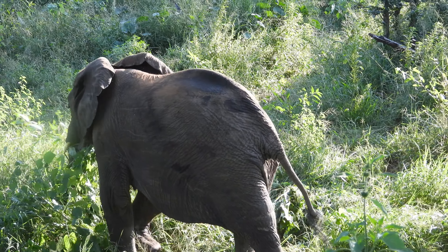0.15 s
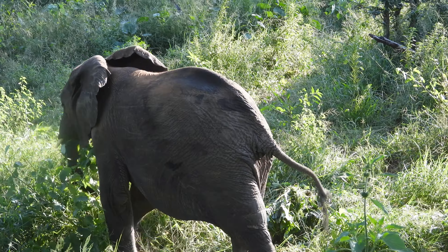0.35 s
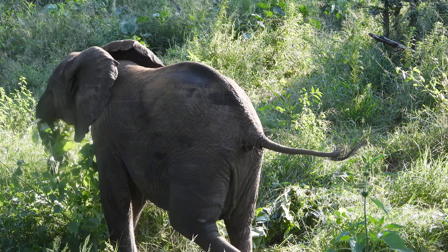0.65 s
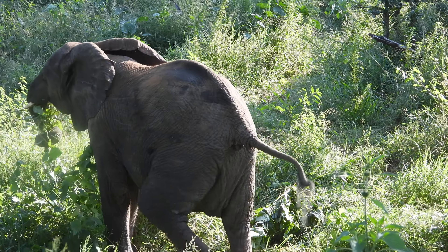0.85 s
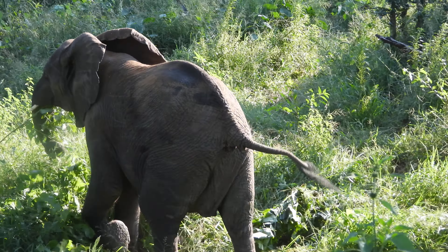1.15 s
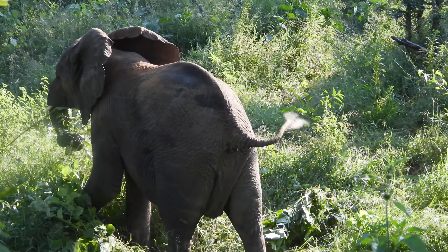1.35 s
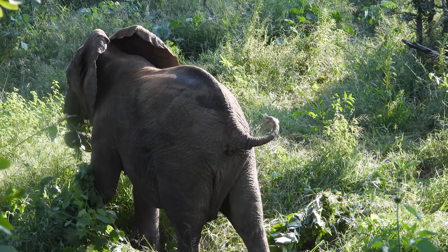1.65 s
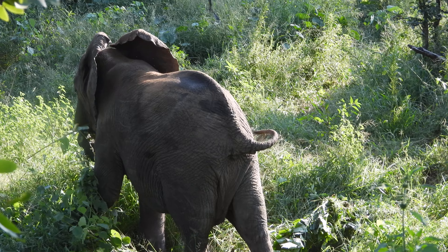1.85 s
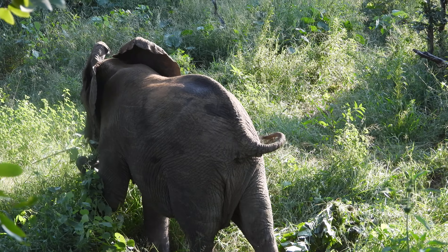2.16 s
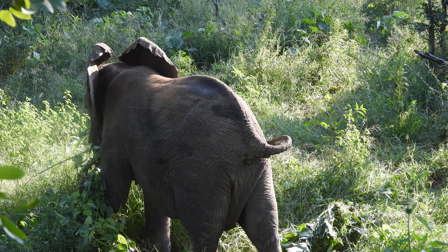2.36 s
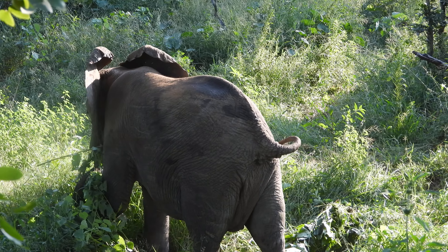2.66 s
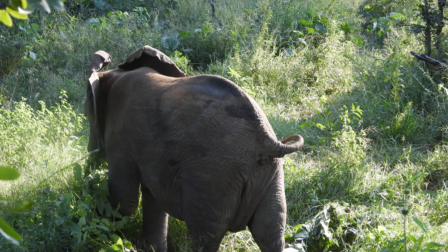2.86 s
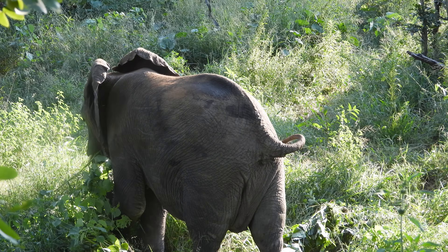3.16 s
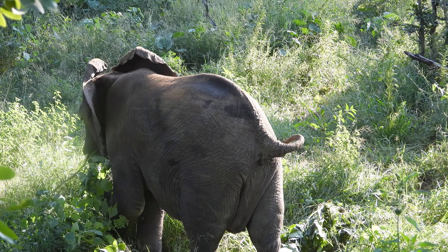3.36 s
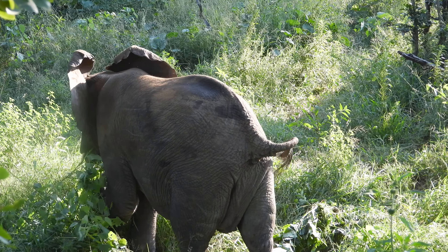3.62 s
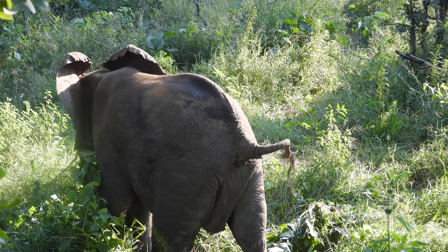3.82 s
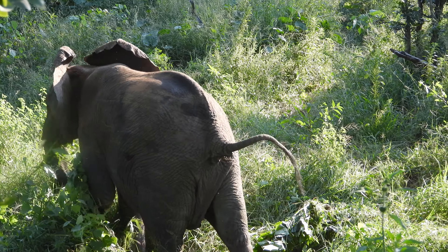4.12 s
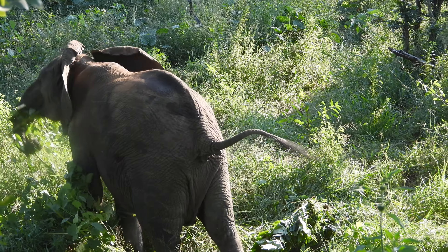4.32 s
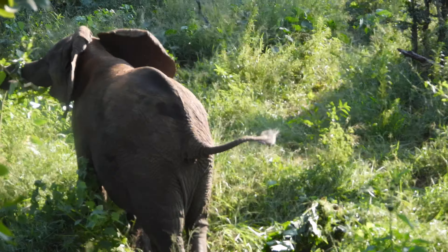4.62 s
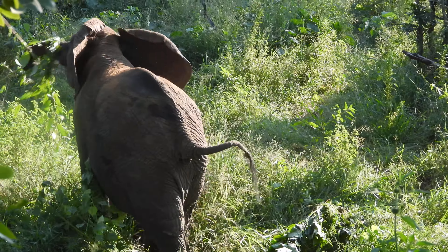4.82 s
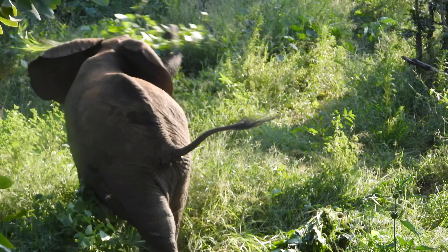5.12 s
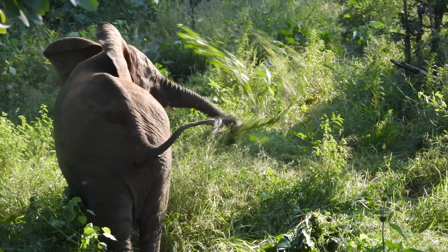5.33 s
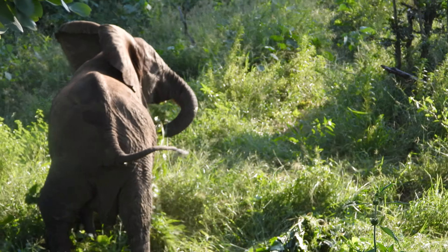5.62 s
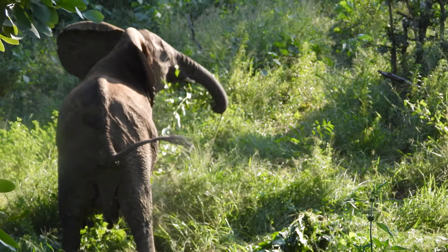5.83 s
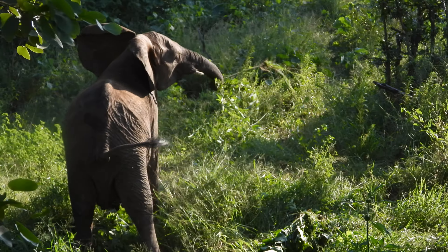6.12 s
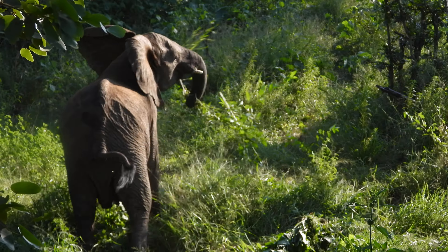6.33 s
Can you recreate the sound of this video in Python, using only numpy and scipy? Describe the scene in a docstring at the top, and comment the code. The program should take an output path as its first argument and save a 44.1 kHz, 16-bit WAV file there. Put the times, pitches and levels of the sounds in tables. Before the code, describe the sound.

Quiet leaves stir and far doves coo, then woody snaps and heavy leafy tearing burst out twice as an elephant pulls at plants.

```python
"""An elephant walks through scrub and tears up a leafy stem, some metres from a small camera. From the start
leaves stir as grainy noise over a steady hiss, and far doves coo in chorus as sagging tones. Soon come pulls
that swell and fade, twigs that snap with a click, ring and thud, and gliding whistles. A small bird first
chirps just before 1.4 s; thick tearing follows near 3.8 s and again from 5.4 s. Throughout, two ports hear it
through the camera housing's colour; source levels are set before that."""
import sys
import numpy as np
from scipy import signal
from scipy.fft import rfft, irfft
from scipy.io import wavfile
from scipy.ndimage import uniform_filter1d

SR = 44100
rng = np.random.default_rng(int(sys.argv[2]) if len(sys.argv) > 2 else 0)


def pcm_store(signal):
    """Save signal as 16-bit PCM."""
    levels = np.round(np.clip(np.atleast_2d(signal), -1, 1) * 32767)
    wavfile.write(sys.argv[1], SR, levels.astype(np.int16).T)


N = 285758  # samples


def amp(db):
    """Turns decibels into an amplitude factor."""
    return 10 ** (np.asarray(db) / 20)


def evened(x):
    """Brings a sound to rms 1."""
    return x / np.sqrt(np.mean(x ** 2) + 1e-20)


def read(points, hz):
    """Reads a spectral curve between its points, on a log pitch axis."""
    f, value = np.transpose(points)
    return np.interp(np.log(hz + 1), np.log(f + 1), value)


def curves(rows):
    """Draws each column of a timed table as straight lines over the whole scene."""
    s, *columns = np.transpose(rows)
    t = np.arange(N) / SR
    return [np.interp(t, s, column) for column in columns]


def add(mix, s, sound):
    """Lays a sound into the mix at s seconds, cut off at the end of the scene."""
    part = mix[..., round(s * SR):][..., :sound.shape[-1]]
    part += sound[..., :part.shape[-1]]


def coloured(x, points):
    """Shapes x by a spectrum and brings it to rms 1."""
    gain = amp(read(points, np.fft.rfftfreq(N, 1 / SR)))
    return evened(irfft(rfft(x) * gain, N))


def glide(hz, level):
    """A sine that follows a moving pitch and level."""
    phase = 2 * np.pi * np.cumsum(hz) / SR
    return level * np.sin(phase)


def flutter(size, per_s):
    """Random wobble: normal random values, per_s of them a second, joined by straight lines."""
    steps = rng.standard_normal(round(size * per_s / SR) + 2)
    return np.interp(np.arange(size) * per_s / SR, np.arange(len(steps)), steps)


def scrub_echo(x, t60, wet_db):
    """Trunks and bushes scatter a far call: sparse fading taps on three separate paths."""
    t = np.arange(SR // 2) / SR
    hits = rng.random((3, len(t))) < .04
    taps = rng.standard_normal((3, len(t))) * hits * amp(-60 * t / t60)
    taps /= np.linalg.norm(taps, axis=1, keepdims=True)
    return x + amp(wet_db) * signal.fftconvolve(x[None], taps, axes=1)[:, :N]


# Spectrum of the steady hiss beneath everything: f/Hz, level/dB per Hz
HISS_SPECTRUM = [(15, -90), (25, -60), (86, -29), (193, -6), (685, -12), (805, -10), (1140, -27),
                 (5160, -13), (8610, -14.5), (11300, -22), (15600, -76)]
HISS_DB = -65.5


def steady_hiss():
    """Steady coloured noise, separate on each side."""
    return amp(HISS_DB) * coloured(rng.standard_normal((2, N)), HISS_SPECTRUM)


# Leaves stirring all the while: t/s, level/dB
STIR_LEVELS = [(0, -52.5), (.2, -55.5), (.4, -52), (1.1, -54), (1.62, -51.5), (1.75, -57), (2.3, -55.5),
               (2.5, -52.5), (3.22, -53.5), (3.35, -56.5), (3.75, -55), (4.25, -53), (5.2, -50.5),
               (5.42, -53), (6.48, -78)]
# Pulls, tears and sweeps through the growth: start t/s, rise/s, hold/s, fade/dB per s,
# leaves level/dB, stalks level/dB, share of breaking/0-1, deep part relative to the stalks/dB
GROWTH_PULLS = [(0.22, 0.065, 0.018, 91, -52, -61.5, 0, -3),
                (0.71, 0.025, 0.22, 108, -45.5, -59, 0.27, -14),
                (1.135, 0.023, 0.018, 59, -55.5, -83, 0, 0), (1.344, 0.051, 0.022, 49, -53.5, -81, 0.3, 0),
                (3.781, 0.059, 0.035, 72, -40, -55, 0.5, 0), (3.903, 0.048, 0.046, 114, -41.5, -57, 0.1, 5),
                (4.343, 0.019, 0.23, 40, -47, -66.5, 0, 6.5), (4.9, 0.042, 0.034, 68, -51, -66, 0.4, 2),
                (5.375, 0.091, 0.048, 166, -50.5, -52, 0.3, -4),
                (5.507, 0.095, 0.03, 40, -42, -52.5, 0.3, -10),
                (5.614, 0.089, 0.056, 21, -37.5, -55.5, 0.1, -1),
                (6.217, 0.11, 0.015, 86, -54.5, -63, 0.1, -7)]
STALKS_REST_DB = -71
DEEP_FADE = 2.2  # the deep part dies this many times faster
STIR_BREAKING = 0.076  # share 0-1


def pulls():
    """Each pull swells, holds and fades; powers add to the resting levels."""
    t = np.arange(N) / SR
    leaf = amp(2 * curves(STIR_LEVELS)[0])  # twice the dB gives power
    stalk = amp(2 * STALKS_REST_DB) * np.ones(N)
    broken, deep = STIR_BREAKING * leaf, stalk
    for s, rise, hold, fade_db, leaf_db, stalk_db, breaking, deep_db in GROWTH_PULLS:
        swell = np.clip((t - s) / max(rise, .005), 0, 1) ** 2
        fade = amp(-2 * fade_db * np.maximum(t - s - rise - hold, 0))
        shape = swell * fade
        leaf = leaf + amp(2 * leaf_db) * shape
        stalk = stalk + amp(2 * stalk_db) * shape
        deep = deep + amp(2 * (stalk_db + deep_db)) * shape ** DEEP_FADE
        broken = broken + breaking * amp(2 * leaf_db) * shape
    share = np.clip(broken / leaf, 0, 1)
    return 10 * np.log10(leaf), 10 * np.log10(stalk), 10 * np.log10(deep), share


def crackle(per_s, spread_db, t60):
    """Power envelope of many small breaks and flicks; a few are large."""
    breaks = rng.random(N) < per_s / SR
    size = amp(spread_db * np.minimum(rng.exponential(size=N), 5)) * breaks
    power = signal.lfilter([1], [1, -amp(-120 / t60 / SR)], size ** 2)
    power = uniform_filter1d(power, size=80)  # each break takes a moment to build
    return power / power.mean()


def patchy(x, patch_db, size=256):
    """Random patches in time and pitch make the noise uneven."""
    z = signal.stft(x, nperseg=size)[2]
    field = rng.standard_normal(z.shape[1:])
    field = uniform_filter1d(field, size=3, axis=0)  # across pitch
    field = evened(uniform_filter1d(field, size=6, axis=1))  # across time
    return evened(signal.istft(z * amp(patch_db * field), nperseg=size)[1][:, :N])


# Spectrum of dry leaves, and of splintering twigs: f/Hz, level/dB per Hz
LEAF_SPECTRUM = [(290, -25.5), (500, -15), (716, -5.5), (1000, -8), (1560, -6.5), (1880, -7.5),
                 (3860, -2.5), (5370, -4), (10900, -11), (15600, -29.5)]
# Spectrum of knocking stalks, and of fibres in a thud: f/Hz, level/dB per Hz
STALK_SPECTRUM = [(20, -60), (100, -47), (150, -3), (215, -3), (400, -2.5), (600, 3), (720, -2.5),
                  (950, -6), (1500, -10.5), (2000, -17.5), (6000, -67)]
# the band above about 9.5 kHz thins when the rustle falls below the knee
TREBLE_DB, TREBLE_KNEE_DB, TREBLE_SLOPE = -4, -53.5, 2.3  # dB, dB, dB per dB


def rustle():
    """Noise gated by grains; stalks give the low body, dry leaves the treble."""
    leaf_db, stalk_db, deep_db, share = pulls()
    treble_db = TREBLE_DB + TREBLE_SLOPE * np.minimum(leaf_db - TREBLE_KNEE_DB, 0)

    grains = np.sqrt(1 - share + share * crackle(per_s=900, spread_db=3., t60=.012))
    leaves = patchy(coloured(grains * rng.standard_normal((3, N)), LEAF_SPECTRUM), 1.67)
    leaves = patchy(leaves, 2.2, size=2048)  # slower, narrower patches: a more tonal rustle
    treble = signal.sosfiltfilt(signal.butter(2, 9500, "high", fs=SR, output="sos"), leaves)
    leaves = leaves + (amp(treble_db) - 1) * treble

    knocks = np.sqrt(0.49 + 0.49 * crackle(per_s=70, spread_db=1.6, t60=0.02))
    stalks = coloured(knocks * rng.standard_normal((3, N)), STALK_SPECTRUM)
    stalks = patchy(stalks, 4.5, size=1024)
    deep = signal.sosfiltfilt(signal.butter(2, 330, fs=SR, output="sos"), stalks)
    return amp(leaf_db) * leaves + amp(stalk_db) * (stalks - deep) + amp(deep_db) * deep


# Dove chorus: t/s, level/dB, share of high voices/0-1
DOVE_CHORUS = [(0, -52.5, 0.12), (.55, -62.5, 0.41), (.96, -55, 0.35), (1.17, -59, 0.24),
               (1.75, -59.5, 0.28), (2.1, -57.5, 0.4), (2.52, -55.5, 0.77), (2.68, -58.5, 0.58),
               (2.97, -55, 0.54), (3.36, -62, 0.3), (3.56, -52, 0.93), (3.75, -60.5, 0.52),
               (4.15, -53, 0.6), (5.1, -56.5, 0.37), (5.4, -54.5, 0.88), (5.7, -70, 0.66),
               (5.92, -50.5, .8), (6.16, -68, 0.4), (6.48, -57, 1)]
LOW_COO_HZ, HIGH_COO_HZ = 806, 884
COO_SPREAD_HZ, COO_SAG_HZ = 62, 25  # largest offset either way, largest sag


def doves():
    """Many far birds coo at once: short purring notes that sag, smeared by the scrub."""
    level_db, high = curves(DOVE_CHORUS)
    out, count = np.zeros(N), 600
    for k, (late, long, off, lean, sag, loud, voice) in enumerate(rng.random((count, 7))):
        size = round((.035 + .075 * long) * SR)
        s = (k + late) / count * N / SR
        centre_hz = HIGH_COO_HZ if voice < high[int(s * SR)] else LOW_COO_HZ
        start_hz = centre_hz + COO_SPREAD_HZ * (off + lean - 1)
        hz = start_hz - COO_SAG_HZ * sag * np.linspace(0, 1, size)
        purr = 1 + .7 * flutter(size, 80)
        add(out, s, glide(hz, np.hanning(size) * purr * amp(-10 * loud)))
    return amp(level_db) * evened(scrub_echo(out, t60=0.23, wet_db=-0.82))


def causal(gain):
    """The most front-loaded click with this spectrum (minimum phase), peak 1."""
    folded = irfft(np.log(gain + 1e-5))
    folded[1:len(gain) - 1] *= 2
    folded[len(gain):] = 0
    click = irfft(np.exp(rfft(folded)))
    return click / abs(click).max()


# Snapping twigs: t/s, crack level/dB, ring f/Hz, crack t60/s, thud level/dB, factor on the stem's pitch
TWIG_SNAPS = [(0.281, -43, 5470, 0.056, -81, 1.4), (0.3286, -48, 3430, 0.022, -62.5, 1.05),
              (0.5342, -35, 5170, .012, -80, 1.3), (0.7455, -26.5, 6100, 0.05, -49.5, 1.14),
              (0.7557, -19, 3450, 0.046, -44, 1.01), (1.1884, -40, 5920, 0.066, -86, 1.4),
              (3.235, -38, 3500, .012, -80, 1), (3.8043, -41, 5500, 0.018, -60, 0.78),
              (3.8552, -25, 2260, 0.012, -58, 0.68), (3.872, -26, 5440, 0.014, -58, 0.72),
              (3.8968, -26, 5900, 0.011, -57, 1.14), (3.9303, -16.5, 2140, 0.011, -50, 0.89),
              (3.942, -25.5, 2580, 0.025, -56, 0.97), (3.9836, -21, 2170, 0.019, -63, 1.5),
              (4.003, -33, 2340, 0.073, -67, 0.57), (4.022, -35, 2450, 0.084, -70.5, 1.7),
              (4.0645, -30, 2490, 0.014, -76, 0.98), (4.4622, -36, 5630, 0.13, -74, 2.3),
              (5.3391, -36, 1930, 0.033, -56.5, 1.19), (5.4195, -26, 2340, 0.013, -48.5, 1.15),
              (5.4394, -36.5, 1700, 0.038, -47, 0.92), (5.455, -38, 1190, 0.026, -40, 1.01),
              (5.4663, -32.5, 4480, 0.023, -55, 2.06), (5.485, -48, 900, 0.021, -56, 0.76),
              (5.595, -34, 1200, 0.037, -64, 0.697), (5.615, -37, 606, 0.043, -65, 0.62),
              (5.68, -35, 1900, .03, -59, 0.86), (5.739, -37, 3240, .02, -60, 0.77),
              (5.773, -42, 990, 0.018, -72, 1.5), (5.831, -31, 2530, 0.022, -68, 1.8),
              (5.883, -33.5, 2470, .03, -72, 1), (5.913, -38, 2950, .02, -60.5, 0.71),
              (6.2955, -36, 3400, 0.019, -69.5, 1), (5.7533, -29, 1950, 0.038, -66, 0.54),
              (6.162, -36, 1270, 0.067, -70, 1.1), (6.1655, -27, 1940, 0.02, -63.5, 0.9),
              (6.1759, -29.5, 1266, 0.055, -58, 1.15), (6.3179, -32.5, 4340, 0.017, -60.5, 1.2)]
# Modes of a green stem, before the pitch factor: f/Hz, level/dB, t60/s
STEM_MODES = [(224, 0, 0.078), (354, 5, 0.11), (612, 4.5, 0.052), (873, 10, 0.043), (1225, 8.5, 0.06)]


def snaps():
    """A burst of splinters, a short ring of the twig, and a slower thud through the stem."""
    out, t = np.zeros((3, N)), np.arange(4096) / SR
    hz = np.fft.rfftfreq(len(t), 1 / SR)
    leaf_gain, stalk_gain = amp(read(LEAF_SPECTRUM, hz)), amp(read(STALK_SPECTRUM, hz))
    for s, crack_db, ring_hz, t60, thud_db, pitch in TWIG_SNAPS:
        fade = amp(-60 * t / max(t60, .004)) * (1 - np.exp(-t / 0.00033))
        body = 0.69 + 0.98 / (1 + ((hz - ring_hz) / (0.75 * ring_hz)) ** 2)
        # thin twigs hold no low sound
        body = body / (1 + (.58 * min(ring_hz, 2600) / (hz + 1)) ** 6)
        splinters = irfft(rfft(rng.standard_normal((3, len(t)))) * leaf_gain * body)
        ring = np.sin(2 * np.pi * ring_hz * t)
        crack = fade * (0.53 * evened(splinters) + 0.34 * ring)
        front = causal(leaf_gain * body)  # the first fibre parts with one sharp click

        fibres = irfft(rfft(rng.standard_normal((3, len(t)))) * stalk_gain)
        modes = np.zeros(len(t))
        for f, db, mode_t60 in STEM_MODES:
            tone = np.sin(2 * np.pi * (pitch * f * t + rng.random()))
            modes += amp(db - 60 * t / mode_t60) * tone
        thud = 0.8 * evened(fibres) * amp(-60 * t / .09) + .8 * modes
        thud = thud * (1 - np.exp(-t / .0015))  # soft onset
        add(out, s, amp(crack_db) * (crack + 0.65 * front) + amp(thud_db) * thud)
    return out


# Single far whistles and coos, before flicker: t/s, length/s, start f/Hz, end f/Hz, level/dB
FAR_WHISTLES = [(.56, .1, 1280, 1270, -68), (.88, .13, 1020, 1110, -64), (.96, .34, 1335, 1350, -71),
                (1.94, .13, 1020, 985, -66.5), (2.235, .09, 1000, 980, -62), (2.52, .09, 970, 1050, -65),
                (2.7, .22, 700, 680, -69), (2.83, .08, 1120, 1140, -63), (2.91, .05, 1350, 1365, -65),
                (3.05, .25, 1355, 1345, -71), (3.53, .06, 1000, 1000, -66), (5.525, .04, 790, 765, -54),
                (5.96, .3, 1330, 1420, -66), (6.312, .075, 990, 860, -55)]
# Notes of one chirp, a flick, down, up and a low end:
# t/s from its start, length/s, start f/Hz, end f/Hz, level relative to the chirp/dB
CHIRP_NOTES = [(0, .014, 3700, 4250, -1.5), (.013, .012, 3800, 3400, -6), (.02, .02, 3400, 2650, -1.5),
               (.042, .014, 2650, 2700, -3), (.051, .013, 3080, 3150, 0), (.062, .013, 3650, 3780, -5),
               (.073, .02, 2680, 2650, -5)]
# When the small bird chirps: t/s, level/dB
CHIRP_TIMES = [(1.383, -52.5), (2.142, -54.5), (3.088, -58), (4.733, -56)]


def birds():
    """Single whistles and four chirps on one pattern; moving air makes them flicker."""
    out = np.zeros(N)
    for s, long, start_hz, end_hz, db in FAR_WHISTLES:
        size = round(long * SR)
        level = amp(db) * signal.windows.tukey(size, .35) * (1 + .7 * flutter(size, 45))
        hz = np.linspace(start_hz, end_hz, size) + 16 * flutter(size, 50)
        add(out, s, glide(hz, level))
    for s, db in CHIRP_TIMES:
        for at, long, start_hz, end_hz, note_db in CHIRP_NOTES:
            size = round(long * SR)
            level = amp(db + note_db) * np.hanning(size) ** .5 * (1 + .3 * flutter(size, 200))
            add(out, s + at, glide(np.linspace(start_hz, end_hz, size), level))
    return scrub_echo(out, t60=.16, wet_db=-1)


# Share of the sound's power that both ports hear alike: f/Hz, share/0-1
PORT_SHARED = [(100, 0.55), (900, 0.92), (1600, 0.59), (3000, 0.79), (4300, 0.47), (5500, 0.78),
               (6600, 0.52), (7800, 0.54), (9500, 0.4), (15000, 0.45)]
# Right port behind left: f/Hz, phase/radians
PORT_LAG = [(100, 0), (3000, .05), (6000, .5), (8000, 1.), (10500, 1.6), (12500, 2.6), (15500, 3.3)]
# Left minus right: f/Hz, level/dB
PORT_LEAN = [(200, -0.5), (2400, 0), (4400, -0.5), (8100, -4), (15000, -4)]


def ports(shared, left, right):
    """Each port hears the shared sound plus a part of its own; the right one is later and brighter."""
    hz = np.fft.rfftfreq(N, 1 / SR)
    same = np.clip(read(PORT_SHARED, hz), 0, 1)
    both = np.sqrt(same) * rfft(shared)
    own = np.sqrt(1 - same)
    lean = amp(read(PORT_LEAN, hz) / 2)
    lag = np.exp(-1j * read(PORT_LAG, hz))
    left_port = (both + own * rfft(left)) * lean
    right_port = (both * lag + own * rfft(right)) / lean
    return irfft(np.array([left_port, right_port]), N)


def scene():
    """Growth and birds reach the two ports as three paths; a steady hiss lies beneath."""
    hiss = steady_hiss()
    paths = rustle() + doves() + snaps() + birds()
    return ports(*paths) + hiss


# Resonances and hollows of the camera housing: f/Hz, width/Hz, level/dB
HOUSING_COLOUR = [(988, 126, 7), (1706, 370, -5.5), (1863, 320, 6.5), (2283, 38, -25), (2320, 65, 4.5),
                  (3750, 870, 2), (3868, 217, -10.5), (4520, 270, 1.5), (4720, 470, -3.5), (5230, 760, 3.5),
                  (6010, 300, 5), (7050, 1850, -2.5), (7980, 1020, 4), (11500, 430, 3), (11530, 190, -3)]
EDGE_HZ = 15720  # upper band limit


def record(dry):
    """Housing colour and the wind filter's bass cut, then the band limit."""
    hz = np.fft.rfftfreq(N, 1 / SR)
    colour_db = sum(db / (1 + (2 * (hz - f) / width) ** 2) for f, width, db in HOUSING_COLOUR)
    wet = irfft(rfft(dry) * amp(colour_db), N)
    wet = signal.sosfilt(signal.butter(3, 130, "high", fs=SR, output="sos"), wet)
    band_limit = signal.firwin(1023, EDGE_HZ, window=("kaiser", 10), fs=SR)
    return signal.oaconvolve(wet, band_limit[None], "same")


dry = scene()
out = record(dry)
pcm_store(out)
```